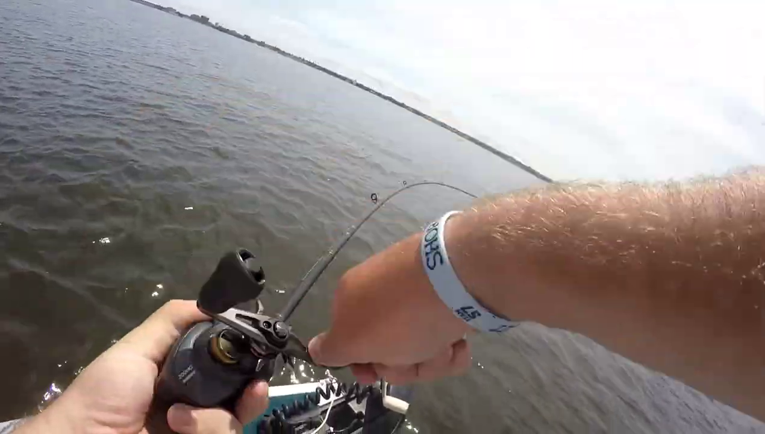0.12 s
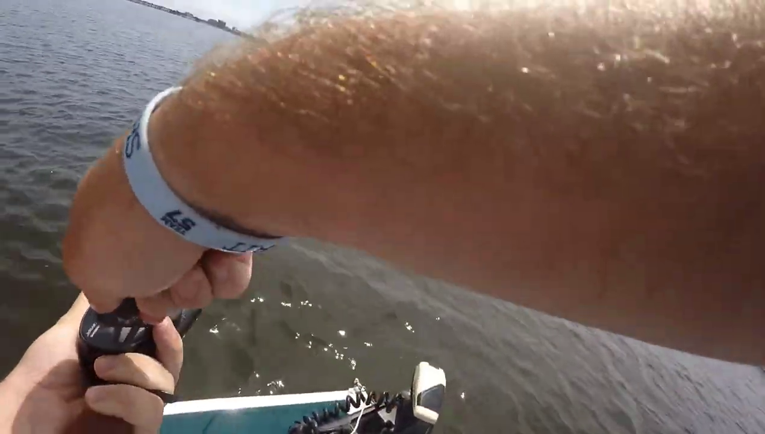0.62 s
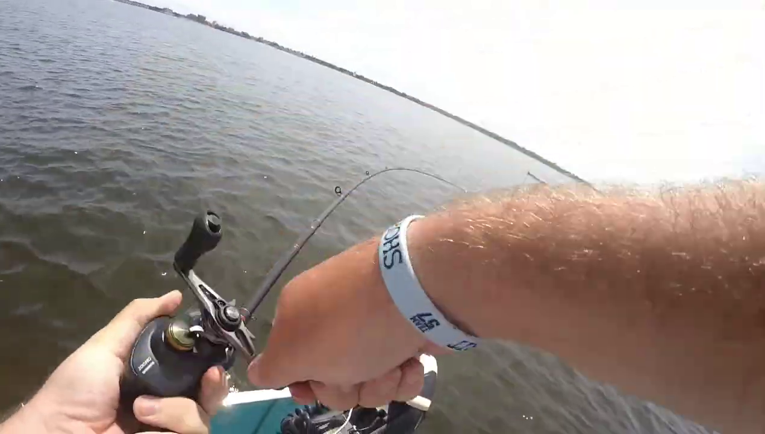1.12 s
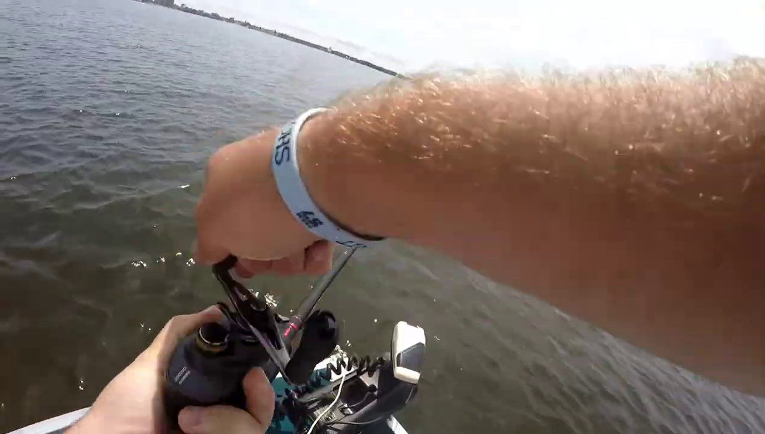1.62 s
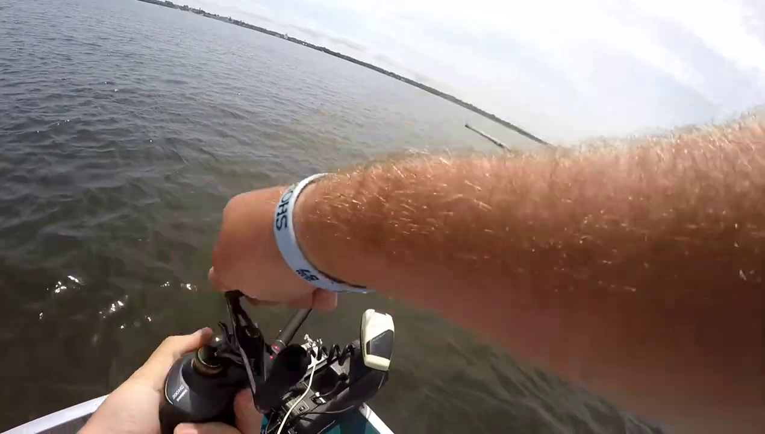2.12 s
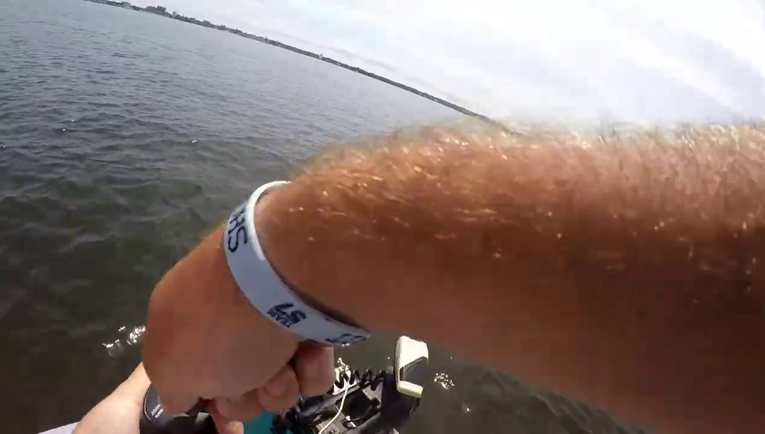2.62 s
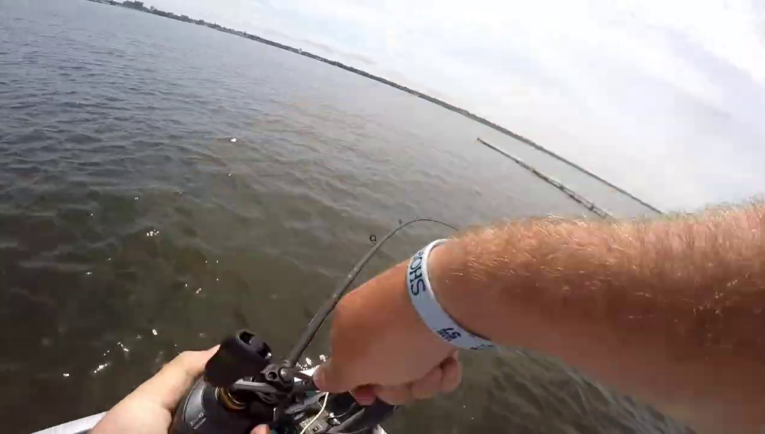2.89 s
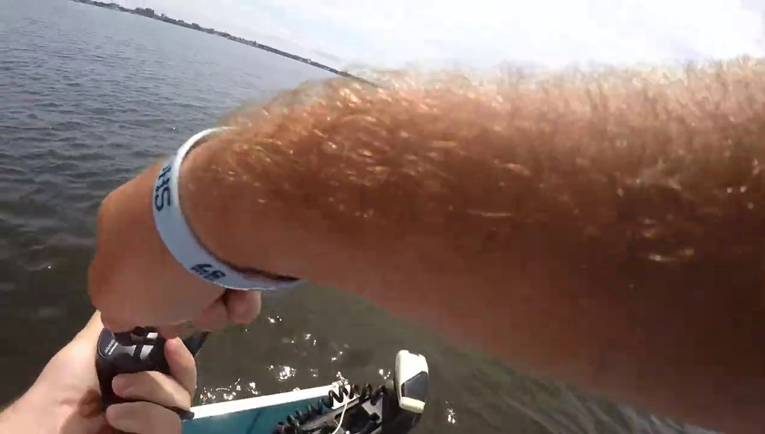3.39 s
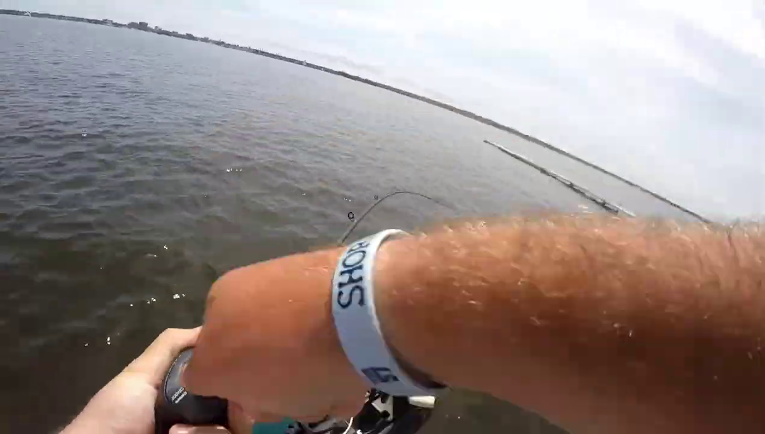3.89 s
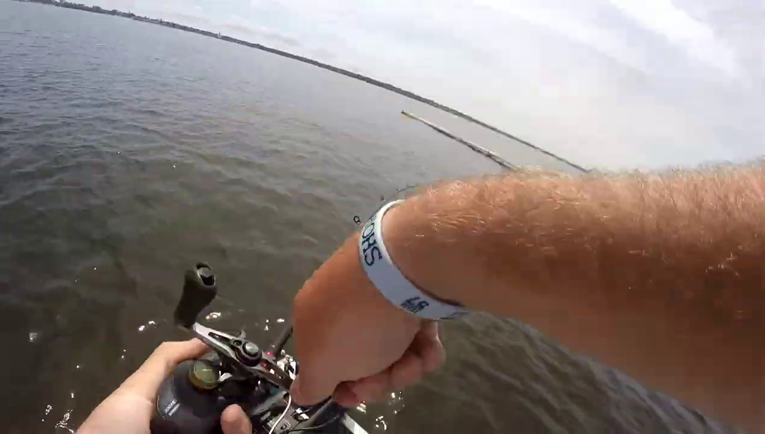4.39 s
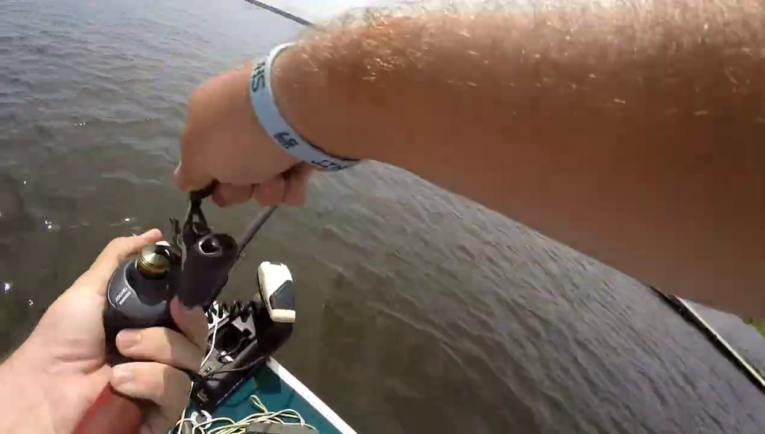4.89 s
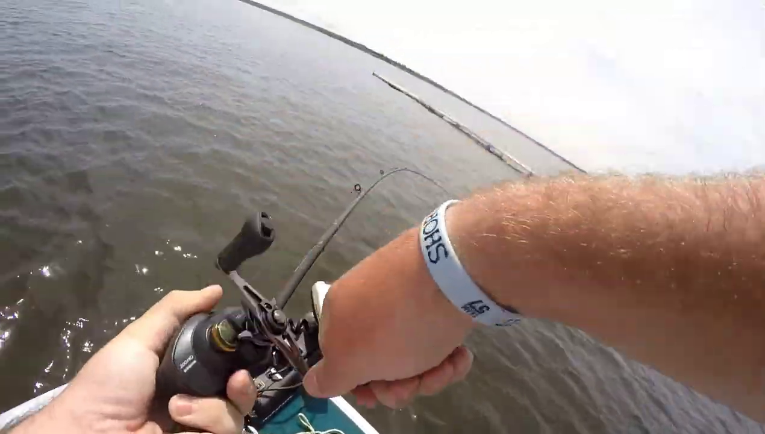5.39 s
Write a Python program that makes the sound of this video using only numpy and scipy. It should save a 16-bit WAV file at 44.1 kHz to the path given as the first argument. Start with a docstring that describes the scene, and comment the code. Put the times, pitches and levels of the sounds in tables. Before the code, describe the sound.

Scratchy, whirring reel gears pulse with fast hand cranking on an open boat, with light ticks, line hiss and steady wind rumble.

```python
"""Open boat: a small baitcasting reel is cranked in quick jerks, close to the microphone.
Gear teeth whine and rasp through the reel frame at a rate that follows the hand; filtered noise is the line hiss.
Loose parts tick and hands scuff the rod, as decaying noise bursts and swells of low noise.
Wind rumble and hull wash are coloured noise; a low hum wavers in pitch and level; gliding tones glug at the hull."""
import sys
import numpy as np
from scipy import signal
from scipy.fft import rfft, irfft, next_fast_len
from scipy.io import wavfile
from scipy.ndimage import uniform_filter1d

SR = 44100
rng = np.random.default_rng(int(sys.argv[2]) if len(sys.argv) > 2 else 0)


def field_ratio(decibels):
    """Amplitude ratio for a level in dB (20 dB per decade); scalars and array-likes work."""
    return 10 ** (np.asarray(decibels, dtype=float) / 20)


def unload_wav(signal):
    """Save mono or channel-first audio to the path in sys.argv[1] as 16-bit WAV at rate SR, clipped to [-1, 1]."""
    wavfile.write(
        sys.argv[1],
        SR,
        np.round(np.clip(np.atleast_2d(signal).T, -1, 1) * 32767).astype(np.int16),
    )


N = 242849
T = np.arange(N) / SR

# Wind and wash over time. Each row: time in seconds, wind rumble in dB, wash in dB.
WEATHER = [(0.0, -32, -38), (0.21, -25, -44.5), (0.37, -34, -41.5), (0.43, -24, -41.5), (0.55, -29, -43),
           (0.58, -21, -44), (0.63, -29, -42.5), (1.15, -31, -40.5), (2.14, -28, -44.5), (3.02, -28, -42),
           (3.46, -27, -44.5), (3.52, -36.5, -43.5), (3.58, -31, -43), (4.6, -31, -43), (4.7, -27, -41.5),
           (4.81, -35, -44.5), (5.41, -30.5, -45), (5.5, -30, -43)]
# Broad colour of the reel frame. Each row: frequency in Hz, gain in dB.
FRAME_COLOUR = [(300, -16.5), (700, -1.5), (1000, -5.5), (1400, -1), (2000, 3), (2800, 1), (3500, -6.5),
                (4100, -9), (5500, -9), (8000, -24.5), (11000, -30), (15500, -23.5)]
# Resonances of the reel frame. Each row: centre in Hz, width in Hz, peak above the broad colour in dB.
FRAME_MODES = [(1352, 230, 5), (1916, 140, 4.4), (2428, 143, 6.6), (2782, 61, 9.2), (3416, 216, 9.9),
               (4730, 100, 9.3), (6200, 120, 5.7), (7290, 140, 7), (9280, 170, 10.2), (11800, 180, 1.3)]


def level(x, db):
    """Set the rms level."""
    return x * field_ratio(db) / np.sqrt(np.mean(x ** 2))


def colour(x, points, modes=()):
    """Minimum-phase filter through (Hz, dB) points, with resonances (Hz, width Hz, dB) on top."""
    size = next_fast_len(N + 8192, True)
    hz = np.maximum(np.arange(size // 2 + 1) * SR / size, 1)
    points_hz, points_db = np.transpose(points)
    gain_db = np.interp(np.log(hz), np.log(points_hz), points_db)
    for centre_hz, width_hz, top_db in modes:
        gain_db = gain_db + top_db / (1 + (2 * (hz - centre_hz) / width_hz) ** 2)
    # folding the cepstrum makes the filter causal
    cepstrum = irfft(np.log(field_ratio(gain_db)), size)
    cepstrum[1:size // 2] *= 2
    cepstrum[size // 2 + 1:] = 0
    response = np.exp(rfft(cepstrum))
    return irfft(rfft(x, size) * response, size)[:N]


def walk(rate_hz):
    """Random levels held 1 / rate_hz, smoothed twice over that time; standard deviation 1."""
    hold = max(int(SR / rate_hz), 60)
    steps = rng.standard_normal(N // 50)[np.arange(N) // hold]
    smooth = uniform_filter1d(uniform_filter1d(steps, hold), hold)
    return smooth / smooth.std()


def curves(table):
    """Columns of a table joined by straight lines in time."""
    time_s, *columns = np.transpose(table)
    return [np.interp(T, time_s, column) for column in columns]


def swells(starts_s, ends_s, start_db, end_db, rise_db_s, fall_db_s):
    """Loudest of several plateaus in dB, each with straight flanks."""
    out_db = np.full(N, -200.)
    for a_s, b_s, a_db, b_db in zip(starts_s, ends_s, start_db, end_db):
        top_db = np.interp(T, [a_s, max(b_s, a_s + 1e-4)], [a_db, b_db])
        rise_db = rise_db_s * np.maximum(a_s - T, 0)
        fall_db = fall_db_s * np.maximum(T - b_s, 0)
        out_db = np.maximum(out_db, top_db - rise_db - fall_db)
    return out_db


def wind():
    """Wind buffets the microphone: low noise whose level follows the weather."""
    # Each row: frequency in Hz, gain in dB.
    rumble_colour = [(8, -13.5), (18, -1), (30, 3.5), (60, -4.5), (95, -6.5), (130, -15.5), (250, -23.5),
                     (500, -67.5)]
    rumble_db, _ = curves(WEATHER)
    rumble = level(colour(rng.standard_normal(N), rumble_colour), 0)
    return rumble * field_ratio(rumble_db + 0.4 * walk(10))


def wash():
    """Water washes around the hull: unsteady noise, mostly low."""
    # Each row: frequency in Hz, gain in dB.
    wash_colour = [(100, -15.5), (200, 0), (400, -7), (725, -15.5), (1050, -25.5), (2000, -30), (3000, -61),
                   (5000, -48), (15500, -79)]
    _, wash_db = curves(WEATHER)
    grain = rng.standard_normal(N) * field_ratio(1.16 * walk(30))
    return level(colour(grain, wash_colour), 0) * field_ratio(wash_db)


def hum():
    """A low tone wavers in pitch and level."""
    centre_hz, hum_db = 159.5, -45.5
    hz = centre_hz * (1 + 0.0363 * walk(30))
    tone = np.cos(2 * np.pi * np.cumsum(hz) / SR)
    return level(tone * field_ratio(2.6 * walk(15)), hum_db)


def glugs():
    """Air pockets close at the hull: short tones that glide."""
    # Each row: start in seconds, start pitch in Hz, end pitch in Hz, peak in dB, length in seconds.
    glug_rows = [(0.828, 286, 310.3, -35.5, 0.029), (1.011, 433, 345.4, -37.5, 0.032),
                 (1.042, 398.6, 433, -37, 0.02), (1.101, 400, 620, -36.5, 0.027),
                 (2.818, 1010, 1051, -43, 0.014), (2.847, 378.3, 401, -42, 0.041),
                 (2.877, 608, 704, -44, 0.018), (2.89, 843, 900, -41, 0.016), (3.109, 337, 372, -38, 0.024),
                 (3.15, 566, 603, -39.5, 0.024), (3.188, 495, 520, -43.5, 0.026),
                 (4.123, 582, 620, -41, 0.017), (4.495, 712, 729, -42.5, .025)]
    out = np.zeros(N)
    for start_s, start_hz, end_hz, peak_db, length_s in glug_rows:
        t = T[:int(length_s * SR)]
        hz = start_hz + (end_hz - start_hz) * t / length_s
        swell = field_ratio(peak_db) * np.sin(np.pi * t / length_s)
        i = int(start_s * SR)
        out[i:i + len(t)] += swell * np.sin(2 * np.pi * np.cumsum(hz) / SR)
    return out


def rubs():
    """Hands shift on the rod: short grainy low scuffs."""
    # Each row: centre in seconds, level at the centre in dB, half length (to 1/e) in seconds.
    rub_rows = [(0.616, -49, 0.042), (.69, -49.5, 0.058), (0.883, -48.5, 0.053), (2.79, -69, 0.016),
                (2.895, -39.5, 0.028), (3.108, -47.5, 0.021), (3.587, -58, 0.035), (4.152, -44.5, 0.025)]
    # Each row: frequency in Hz, gain in dB.
    rub_colour = [(150, -11), (350, -5), (550, -1), (900, -5.5), (1500, -3.5), (2500, -34), (5000, -77)]
    swell = sum(field_ratio(db) * np.exp(-((T - centre_s) / half_s) ** 2) for centre_s, db, half_s in rub_rows)
    grain = rng.standard_normal(N) * field_ratio(2.5 * walk(120))
    return swell * level(colour(grain, rub_colour), 0)


def ticks():
    """Loose parts tick: decaying noise, sharp and bright, with a duller knock through the frame."""
    tick_decay_s, knock_decay_s = 0.00057, 0.0016
    # Each row: start in seconds, sharp tick in dB, frame knock in dB; both levels before filtering.
    tick_rows = [(0.055, -52, -22.5), (0.1451, -51, -39), (0.3774, -58, -50), (0.507, -58, -56),
                 (0.5986, -62, -40), (0.63, -60, -29.5), (0.637, -50, -43), (0.653, -56, -38),
                 (0.6844, -54, -58), (0.7264, -57, -46), (0.748, -48, -42), (0.759, -51, -42),
                 (0.8225, -55, -42), (1.0524, -59, -26), (1.6573, -39, -34), (1.7362, -30, -27),
                 (1.742, -41, -42), (1.7935, -62, -31), (1.983, -57, -31), (2.144, -38, -26),
                 (2.151, -38, -36), (2.292, -64, -27), (2.781, -35, -46), (3.12, -45, -44),
                 (3.304, -58, -54), (3.5438, -47, -44), (3.7414, -56, -44), (3.926, -36, -21),
                 (3.9913, -36, -39), (4.2752, -37, -28), (4.3201, -36, -46), (4.336, -30.5, -30),
                 (4.413, -45, -43), (4.4657, -32.5, -35), (4.8194, -50, -28), (4.9028, -40, -26),
                 (5.0217, -40, -45), (5.0794, -40, -21), (5.2394, -41, -46), (5.2529, -33.5, -30),
                 (5.2704, -43, -38), (5.3976, -40, -47)]
    # Each row: frequency in Hz, gain in dB.
    tick_colour = [(2500, 3), (5500, 4), (8000, 4.5), (12000, 1), (15000, 0)]
    sharp, knock, t = np.zeros(N), np.zeros(N), T[:800]
    signs = np.sign(rng.standard_normal((len(tick_rows), 2, len(t))))
    for (start_s, tick_db, knock_db), (tick_signs, knock_signs) in zip(tick_rows, signs):
        i = int(start_s * SR)
        sharp[i:i + len(t)] += field_ratio(tick_db) * tick_signs * np.exp(-t / tick_decay_s)
        knock[i:i + len(t)] += field_ratio(knock_db) * knock_signs * np.exp(-t / knock_decay_s)
    dull = uniform_filter1d(knock, size=5)
    return colour(sharp, tick_colour) + colour(dull, FRAME_COLOUR, FRAME_MODES)


def hand():
    """Pulls on the crank set the rasp; jerks within them set tooth rate and whine level."""
    # Each row: start in seconds, length in seconds, base rasp at start in dB, base rasp at end in dB.
    pulls = [(0, 0.092, -38.5, -47), (0.091, .21, -41.5, -42.5), (0.377, 0.065, -48.5, -48),
             (.56, 0.081, -66, -57), (0.674, .015, -50.5, -54), (0.742, 0.0097, -51, -47),
             (.775, 0.044, -62, -67), (.857, .17, -40, -39.5), (1.039, 0.06, -51, -42),
             (1.104, .29, -42.5, -42.5), (1.465, 0.11, -38.5, -45.5), (1.598, 0.11, -44.5, -44.5),
             (1.736, .01, -46, -48), (1.78, 0.1, -45, -45), (1.889, 0.14, -42, -44.5),
             (2.044, 0.029, -45, -44.5), (2.115, .1, -43, -45.5), (2.281, 0.021, -44.5, -48.5),
             (2.432, 0.096, -48.5, -46.5), (2.532, 0.2, -45.5, -44.5), (2.772, .13, -40, -43),
             (2.933, 0.13, -46, -41.5), (3.096, .05, -58, -56), (3.547, .17, -44, -40),
             (3.759, .12, -43, -44.5), (3.891, 0.21, -42.5, -42), (4.148, 0.21, -43, -45),
             (4.407, 0.047, -43, -44.5), (4.47, 0.089, -42.5, -44), (4.576, 0.081, -43.5, -41.5),
             (4.719, 0.25, -43, -44.5), (5.033, 0.15, -42, -43.5), (5.19, 0.076, -45.5, -43),
             (5.33, .12, -46.5, -45), (5.472, 0.03, -46, -40.5)]
    # Each row: start in seconds, top in seconds, tooth rate at start in Hz, tooth rate at top in Hz,
    # whine under full load in dB. After its top the speed slides to the start of the next jerk.
    jerks = [(0, .01, 804, 781.4, -39), (0.038, 0.034, 670.6, 676, -50), (.105, .135, 679.5, 959.5, -46),
             (.14, .154, 1054, 1310, -38.5), (0.188, .2, 1172, 1150, -47.5), (0.253, 0.284, 625, 626, -45),
             (0.335, 0.389, 752, 865, -49.5), (0.428, 0.437, 720, 706, -62),
             (.855, 0.881, 929, 1122, -39.5), (0.898, .93, 850, 721.5, -39.5),
             (0.943, 0.977, 735, 837, -38.5), (1.008, 1.04, 769, 809, -45.5),
             (1.094, 1.156, 884, 1200, -41), (1.173, 1.225, 1076, 1282, -40),
             (1.26, 1.301, 1000, 1133, -42.5), (1.323, 1.377, 1157, 1457, -41.5),
             (1.402, 1.45, 1345, 1360, -46.5), (1.481, 1.554, 1188, 1414, -41),
             (1.597, 1.644, 746, 1129, -42.5), (1.673, 1.68, 1042, 971, -39.5),
             (1.696, 1.801, 848, 875, -55), (1.868, 1.948, 581, 826, -50.5),
             (1.966, 2.009, 886, 1134, -43.5), (2.103, 2.131, 766, 1115, -39),
             (2.147, 2.175, 1086, 1120, -40.5), (2.21, 2.24, 852, 620, -54), (2.273, 2.293, 610, 652, -47),
             (2.53, 2.556, 559.4, 705, -42), (2.572, 2.59, 703, 682, -43), (2.611, 2.679, 659, 775, -44.5),
             (2.715, 2.728, 725, 738.6, -46), (2.777, 2.808, 760, 974, -44), (2.82, 2.865, 1025, 1291, -43),
             (2.925, 2.952, 818, 1392, -37), (2.967, 2.98, 1425, 1356, -36.5),
             (2.995, 3.029, 1223, 1162, -42), (3.078, 3.088, 882, 880, -62),
             (3.556, 3.586, 671.5, 826, -43.5), (3.618, 3.69, 697, 1161, -43.5),
             (3.721, 3.758, 661, 800, -51), (3.794, 3.848, 830, 922.5, -40.5),
             (3.861, 3.916, 1000, 1398, -42), (3.952, 3.957, 1145, 1139, -60),
             (3.999, 4.04, 1110, 1388, -44), (4.048, 4.069, 1420, 1733, -53),
             (4.098, 4.105, 1468, 1461, -58), (4.134, 4.165, 799, 1386, -45),
             (4.197, 4.228, 1554, 1965, -43), (4.276, 4.333, 1052, 1733, -44.5),
             (4.365, 4.379, 1241, 1253, -62), (4.43, 4.458, 1380, 1432, -41.5),
             (4.47, 4.5, 1530, 1877, -41.5), (4.548, 4.56, 1344, 1250, -47),
             (4.579, 4.615, 954, 1446, -42.5), (4.64, 4.66, 1275, 1006, -58),
             (4.712, 4.735, 1008, 1381, -41.5), (4.762, 4.82, 1118, 1660, -46.5),
             (4.864, 4.876, 1073, 1177, -58), (4.889, 4.956, 1121, 1614, -44.5),
             (4.979, 4.99, 1100, 1046, -60), (5.015, 5.045, 1117, 1624, -46),
             (5.09, 5.113, 1325, 1442, -43), (5.14, 5.172, 1316, 801, -52), (5.2, 5.242, 1052, 1490, -45.5),
             (5.283, 5.364, 987, 835, -50.5), (5.402, 5.49, 757, 1136, -50.5)]
    pull_rise_db_s, pull_fall_db_s, rest_db = 517, 420, -67
    whine_rise_db_s, whine_fall_db_s = 452, 502
    attack_s, longest_hold_s = 0.014, 0.021
    hold_share = 0.76  # of the slowing that still sings
    round_top = .45  # 0 pointed, 1 flat tops
    load_full_db, load_slope = -48.5, 0.48  # teeth stop singing as the rasp sinks under this level
    rasp_per_whine = 0.084  # dB per dB

    start_s, length_s, start_db, end_db = np.transpose(pulls)
    rasp_db = swells(start_s, start_s + length_s, start_db, end_db, pull_rise_db_s, pull_fall_db_s)
    rasp_db = np.maximum(rasp_db, rest_db)

    start_s, top_s, start_hz, top_hz, jerk_db = np.transpose(jerks)
    # position along the chain start, top, start..; bent so that the speed lingers at each top and turns sharply
    # at each start
    chain = np.arange(2 * len(start_s))
    place = np.interp(T, np.ravel([start_s, top_s], "F"), chain)
    place = place + round_top * np.sin(np.pi * place) / np.pi
    tooth_hz = np.interp(place, chain, np.ravel([start_hz, top_hz], "F"))
    tooth_hz = uniform_filter1d(tooth_hz, size=250)

    slowing_s = np.append(start_s[1:], T[-1]) - top_s
    hold_s = np.minimum(hold_share * slowing_s, longest_hold_s)
    whine_db = swells(start_s + attack_s, top_s + hold_s, jerk_db, jerk_db, whine_rise_db_s, whine_fall_db_s)
    whine_db = whine_db + load_slope * np.minimum(rasp_db - load_full_db, 0)
    rasp_db = rasp_db + rasp_per_whine * (np.maximum(whine_db, -55) + 24.5)
    return rasp_db + 1.47 * walk(40), tooth_hz, whine_db


def line(rasp_db, tooth_hz):
    """Hiss of line and bearings follows effort and speed, rings the frame; its bands flare one by one."""
    over_rasp_db, db_per_octave = -11.5, 8  # over the rasp at 1000 teeth a second; faster is louder
    flare_db, flares_per_s = 2.5, 9
    # Each row: frequency in Hz, gain in dB.
    line_colour = [(3000, 9.5), (5000, 0.5), (7000, 8.5), (10000, 1), (12500, -4.5), (15500, -39)]
    # Edges between the flaring bands in Hz.
    edges_hz = [4500, 6500, 8500, 11500, 14500]
    grain = rng.standard_normal(N) * field_ratio(1.8 * walk(500))
    hiss = level(colour(grain, line_colour, FRAME_MODES), 0)
    lows = [signal.sosfilt(signal.butter(3, hz, fs=SR, output="sos"), hiss) for hz in edges_hz]
    bands = np.diff([0 * hiss, *lows, hiss], axis=0)
    hiss = sum(band * field_ratio(flare_db * walk(flares_per_s)) for band in bands)
    speed_db = db_per_octave * np.log2(tooth_hz / 1e3)
    return hiss * field_ratio(rasp_db + over_rasp_db + speed_db + 1.6 * walk(24.99))


def gears(rasp_db, tooth_hz, whine_db):
    """Each tooth is a short push; sliding flanks rasp once a tooth; both ring the frame."""
    # Overtones of one tooth push at 1000 teeth a second, from the fundamental up, in dB.
    tooth_db = [-3, 1, -1, -1, -8, -13]
    bright_db_per_octave = 1.2  # each higher overtone gains this as the speed doubles
    tooth_hz = tooth_hz * (1 + .017 * walk(300))
    phase = 2 * np.pi * np.cumsum(tooth_hz) / SR
    octaves = np.log2(tooth_hz / 1e3)

    whine = np.zeros(N)
    for k, db in enumerate(tooth_db):
        # uneven teeth: every overtone swells and breaks up alone
        flutter_db = 3.3 * walk(60) + 2.8 * walk(300)
        overtone_db = db + flutter_db + k * bright_db_per_octave * octaves
        whine += field_ratio(overtone_db) * np.cos((k + 1) * phase)
    whine = colour(whine, FRAME_COLOUR, FRAME_MODES)
    # even out the running rms, so that whine_db holds at any speed
    whine /= np.sqrt(uniform_filter1d(whine ** 2, size=1500))
    whine *= field_ratio(whine_db + 3.26 * walk(45))

    rasp = rng.standard_normal(N) * (1 + .5 * np.cos(phase)) * field_ratio(1.5 * walk(600))
    rasp = level(colour(rasp, FRAME_COLOUR, FRAME_MODES), 0)
    return whine + field_ratio(rasp_db) * rasp


def scene():
    """Everything is near and outdoors: no echo."""
    rasp_db, tooth_hz, whine_db = hand()
    background = wind() + wash() + hum() + glugs()
    handling = rubs() + ticks()
    reel = line(rasp_db, tooth_hz) + gears(rasp_db, tooth_hz, whine_db)
    return (background + handling + reel)[None]


def roll_off(x):
    """The treble ends steeply here."""
    return signal.sosfilt(signal.butter(12, 15710, fs=SR, output="sos"), x)


def record(dry):
    """Microphone hiss joins, then a steep low-pass cuts the top."""
    hiss_db, top_hz = -68.5, 15350  # hiss level before the cut
    wet = dry + field_ratio(hiss_db) * rng.standard_normal(dry.shape)
    wet = signal.sosfilt(signal.ellip(12, .2, 70, top_hz, fs=SR, output="sos"), wet)
    return roll_off(wet)


dry = scene()
out = record(dry)
unload_wav(out)
```